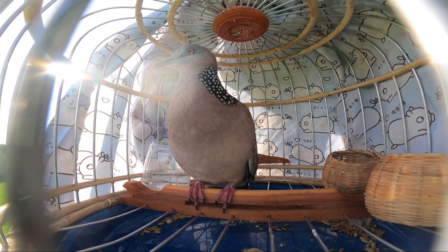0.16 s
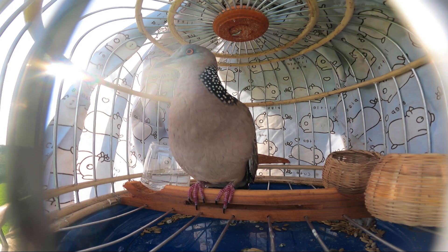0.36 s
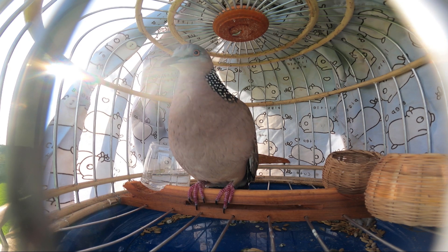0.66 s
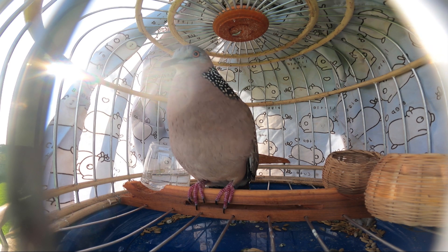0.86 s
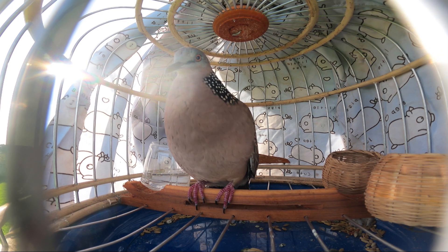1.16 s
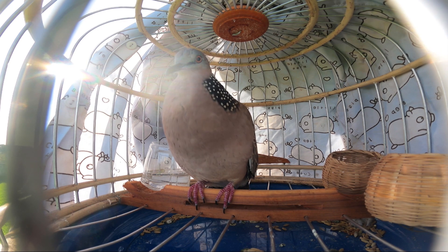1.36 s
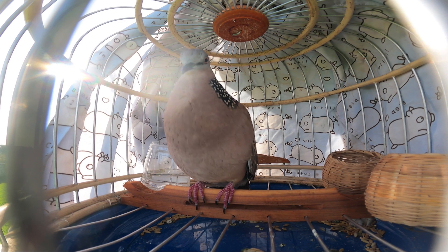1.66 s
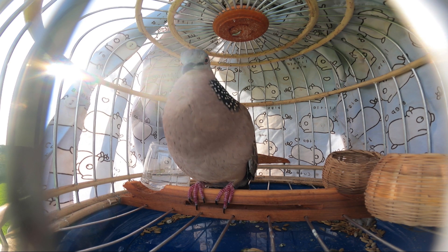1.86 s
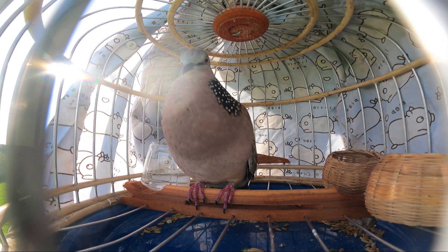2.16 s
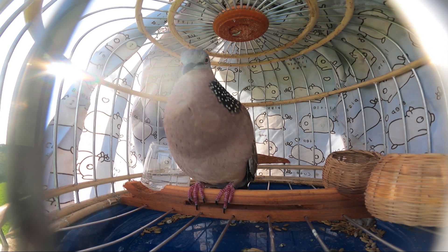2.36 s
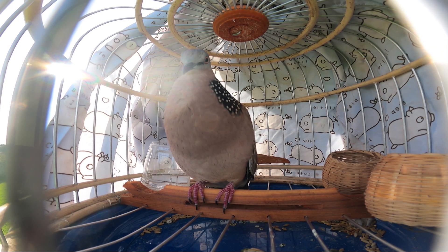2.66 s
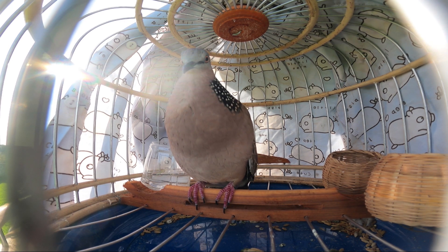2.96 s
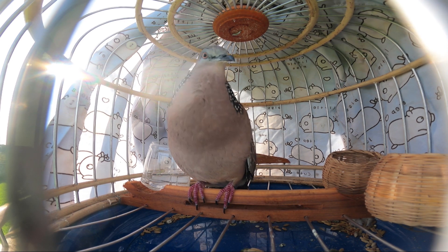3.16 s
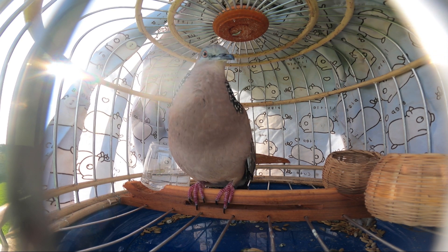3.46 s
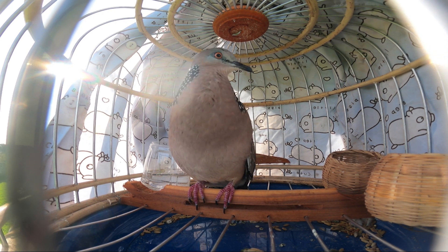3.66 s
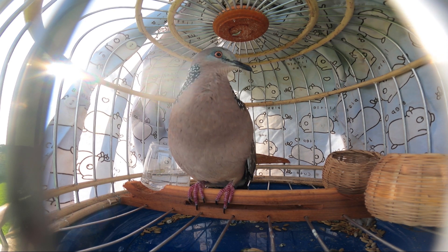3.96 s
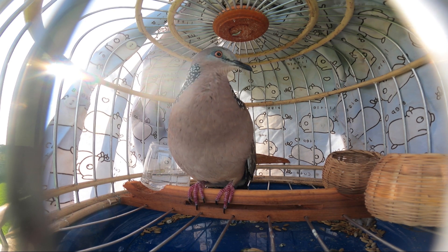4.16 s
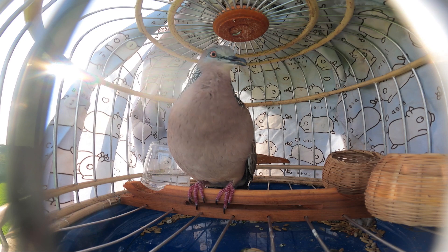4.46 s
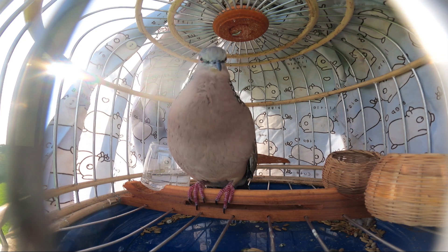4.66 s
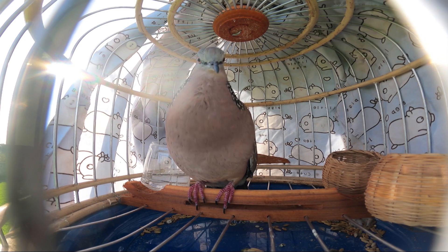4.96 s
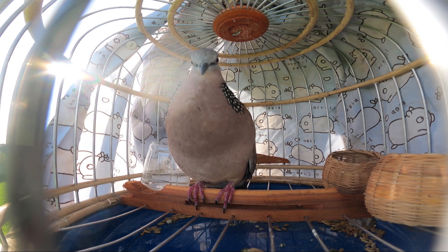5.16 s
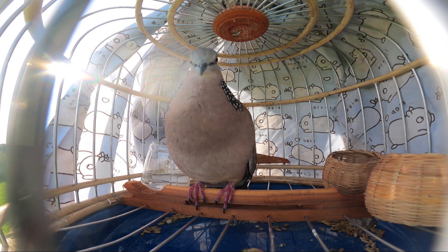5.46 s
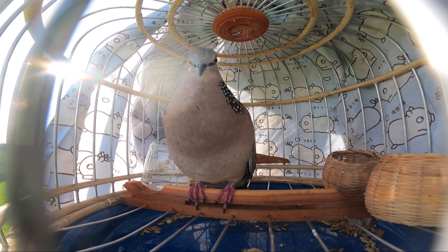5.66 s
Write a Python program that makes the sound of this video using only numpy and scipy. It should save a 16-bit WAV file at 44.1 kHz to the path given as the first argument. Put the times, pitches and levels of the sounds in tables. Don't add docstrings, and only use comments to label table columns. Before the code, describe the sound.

Loud, rounded dove coos with a throbbing roll, slightly overdriven on the left, against low traffic rumble, thin hiss and distant chirps.

```python
import sys
import numpy as np
from scipy import signal
from scipy.fft import rfft, irfft, next_fast_len
from scipy.io import wavfile
from scipy.ndimage import uniform_filter1d

SR = 44100
rng = np.random.default_rng(int(sys.argv[2]) if len(sys.argv) > 2 else 0)


def magnitude_from_level(level_db):
    exponent = np.asarray(level_db, float) / 20
    return 10 ** exponent


def generate_wav(signal):
    frames = np.transpose(np.atleast_2d(signal))
    scaled = np.clip(frames, -1, 1) * 32767
    pcm = np.round(scaled).astype(np.int16)
    wavfile.write(sys.argv[1], SR, pcm)


N = 256662


def rms_one(x):
    return x / np.sqrt(np.mean(x ** 2) + 1e-20)


def at_hz(points, hz, column=1):
    points = np.array(points)
    return np.interp(np.log(hz), np.log(points[:, 0]), points[:, column])


def drift(rate_hz):
    r = np.exp(-2 * np.pi * rate_hz * 20 / SR)
    slow = signal.lfilter([1], [1, -2 * r, r * r], rng.standard_normal(N // 20 + 4002))[4000:]
    return np.interp(np.arange(N) / 20, np.arange(len(slow)), rms_one(slow))


def band(x, low_hz, high_hz):
    sos = signal.butter(2, [low_hz, min(high_hz, .47 * SR)], "band", fs=SR, output="sos")
    return signal.sosfilt(sos, x)


def add(out, s, piece):
    i = round(s * SR)
    out[..., i:i + piece.shape[-1]] += piece[..., :N - i]


def swell(length_ms, peak_at=0.21):
    x = np.linspace(0, 1, round(length_ms * SR / 1000))
    return np.sin(np.pi / 2 * np.interp(x, [0, peak_at, 1], [0, 1, 0])) ** 2


def late(x, samples):
    return np.concatenate([np.zeros(samples), x[:N - samples]])


# f/Hz, likeness [0-1]
LIKENESS = [(60, 1), (200, 0.77), (600, 0.47), (1500, 0.63), (3000, 0.05), (8000, 0.11)]
# f/Hz, level/dB
LEAN = [(60, -1), (110, -1.5), (200, -0.5), (400, -1.5), (1290, -2), (2380, 2), (6000, 1), (15000, -1.5)]
TWITTER_HZ, TWITTER_DB = 5000, .8


def banded_noise(spectrum, gains_db, patchy_db):
    out, together = 0, drift(0.98)
    edges_hz = 22 * 2 ** np.arange(0, 9.7, .4)
    white = rng.standard_normal((2, 2, N))
    for k, (low_hz, high_hz) in enumerate(zip(edges_hz, edges_hz[1:])):
        mid, side = band(white[k % 2], low_hz, high_hz)
        hz = np.sqrt(low_hz * high_hz)
        alike = np.clip(at_hz(LIKENESS, hz), 0, 1)
        lean = magnitude_from_level(at_hz(LEAN, hz) / 2)
        flicker_db = patchy_db + TWITTER_DB * np.exp(-np.log(hz / TWITTER_HZ) ** 2 / .2)
        flicker = flicker_db * (1.4 * together + drift(8.2))
        gain = magnitude_from_level(at_hz(spectrum, hz) + gains_db(hz) + flicker)
        stereo = np.sqrt(1 + alike) * mid + np.sqrt(1 - alike) * side * [[1], [-1]]
        out = out + gain * stereo * [[lean], [1 / lean]]
    return out


# t/s, level/dB
TRAFFIC = [(0.0, -43.5), (0.25, -42.5), (1.2, -37.5), (1.75, -35), (2.0, -38.5), (2.93, -35), (3.92, -37.5),
           (3.94, -46), (4.44, -42.5), (5.1, -40.5), (5.82, -35.5)]
# f/Hz, level/dB per Hz
AIR_SPECTRUM = [(12, -44), (20, -15.5), (74, -0.5), (127, -5.5), (172, -5.5), (277, -13.5), (347, -15.5),
                (422, -16),
                (542, -20.5), (1200, -27.5), (2200, -35), (3300, -41), (6010, -46), (7730, -60.5), (9670, -45),
        (16000, -78)]
HUM_FOLLOWS, HISS_FOLLOWS = .85, 0.8
AIR_LAG_SAMPLES = 22


def background():
    s, db = np.transpose(TRAFFIC)
    swing_db = np.interp(np.arange(N) / SR, s, db + 38.2)

    def blend(hz):
        return swing_db * np.interp(np.log(hz), np.log([200, 1200, 7000]), [1, HUM_FOLLOWS, HISS_FOLLOWS])

    left, right = magnitude_from_level(-12.5) * banded_noise(AIR_SPECTRUM, blend, patchy_db=0.76)
    both = np.array([late(left, AIR_LAG_SAMPLES), right])
    return both - .7 * band(both, 7200, 8200)


# f/Hz, level/dB rms
MACHINE = [
    (1373, -73),
]


def whine():
    (hz, db), = MACHINE
    return magnitude_from_level(db) * rms_one(band(rng.standard_normal(N), hz - 12, hz + 12))


def sweeps(table, peak_at):
    out = np.zeros(N)
    for s, length_ms, start_hz, end_hz, db in table:
        shape = swell(length_ms, peak_at) ** 0.53
        phase = 2 * np.pi * np.cumsum(np.linspace(start_hz, end_hz, len(shape))) / SR
        add(out, s, magnitude_from_level(db) * shape * np.sin(phase))
    return out * magnitude_from_level(2.4 * drift(90))


# t/s, length/ms, start f/Hz, end f/Hz, level/dB
SLIDES = [(.02, 53, 1600, 2036, -46.5), (.07, 25, 1950, 1590, -51), (.435, 95, 2540, 2420, -58),
          (.452, 9, 3150, 2450, -51), (.57, 30, 2500, 2660, -50), (.718, 28, 2990, 2205, -45),
          (.742, 9.9, 3420, 3000, -49), (.745, 68, 2520, 2380, -55.5), (.862, 24, 2450, 2580, -55),
          (1.3, 18, 2820, 2640, -52), (1.54, 27, 1583, 1645, -51), (1.563, 17.5, 1630, 1900, -47),
          (1.578, 18, 1900, 1650, -48), (1.608, 22, 2530, 1990, -47), (1.63, 16, 1970, 1950, -54),
          (1.7, 32, 1643, 1715, -50), (1.727, 14, 1720, 1946, -52.5), (2.04, 57, 1650, 1840, -54),
          (2.048, 30, 3580, 3710, -54), (2.228, 30, 5150, 5550, -50), (2.283, 28, 5330, 5330, -55),
          (2.63, 107, 5450, 5250, -58.5), (2.705, 29, 2626, 2460, -40.5), (2.742, 23, 2806, 2430, -38.5),
          (3.172, 20, 2474, 2400, -43), (3.198, 16, 2450, 2250, -50), (3.41, 250, 2040, 2030, -52.5),
          (3.513, 110, 3430, 3520, -49.5), (3.555, 14, 2870, 2350, -42), (3.568, 20, 2750, 2220, -37.5),
          (3.594, 20, 2930, 2170, -41), (3.678, 32, 3500, 3470, -57), (3.72, 120, 2205, 2230, -55),
          (3.891, 44, 3000, 2950, -49), (4.815, 20, 2510, 2490, -55.5), (4.805, 86, 3520, 3560, -53.5),
          (4.885, 12, 5550, 5850, -50.5), (4.83, 50, 4850, 5050, -62.5), (5.04, 67, 1580, 2050, -46.5)]


def far_slides():
    return sweeps(SLIDES, peak_at=0.66)


def yard(x, t60_s=.5):
    t = np.arange(round(.5 * SR)) / SR
    echo = rng.standard_normal((2, len(t))) * magnitude_from_level(-60 * t / t60_s) * np.clip(t / 0.015, 0, 1)
    return signal.fftconvolve(x[None], echo / np.sqrt(np.sum(echo[0] ** 2)), axes=1)[:, :N]


def bursts(table, width, throb_db, rate_hz):
    out, throb = np.zeros(N), magnitude_from_level(throb_db * drift(rate_hz))
    for s, length_ms, hz, db in table:
        shape = swell(length_ms) ** .6
        low_hz, high_hz = hz / width, hz * width
        noise = band(band(rng.standard_normal(SR // 2), low_hz, high_hz), low_hz, high_hz)
        add(out, s, magnitude_from_level(db) * shape * rms_one(noise[999:999 + len(shape)]))
    return out * throb


# t/s, length/ms, centre f/Hz, level/dB
CHURRS = [(.41, 120, 2600, -60), (4.88, 39, 4600, -57), (.55, 83, 2570, -52.5), (.68, 120, 2600, -56),
          (2.62, 120, 5400, -53), (2.62, 60, 4500, -58), (2.715, 87, 2550, -48), (3.04, 130, 5250, -65),
          (3.175, 77, 2450, -51), (3.55, 120, 2610, -47), (4.878, 55, 4600, -46.5), (1.9, 60, 5850, -55.5),
          (4.84, 60, 5500, -57), (.05, 86, 1900, -58.5), (3.62, 50, 4800, -60), (3.64, 100, 5700, -58),
          (3.81, 67, 5000, -54), (.2, 110, 4400, -57), (4.71, 39, 5200, -56.5), (4.715, 40, 3400, -61),
          (3.93, 57, 2450, -54), (5.2, 170, 4400, -55)]


def churrs():
    return bursts(CHURRS, width=1.11, throb_db=4.0, rate_hz=90)


# t/s, length/ms, level/dB
RUSTLES = [
    (0.17, 100, -52),
    (1.097, 82, -51.5),
    (2.045, 71, -56),
    (4.22, 94, -59.5),
    (4.574, 44, -48.5),
    (4.67, 46, -54.5),
    (4.71, 70, -55),
    (5.196, 110, -49),
]
# f/Hz, level/dB per Hz
RUSTLE = [(1470, -65), (2500, -16), (3350, -22.5), (3780, -21), (6190, -16.5), (7700, -33), (9210, -20.5),
          (15000, -62)]


def rustles():
    gate = np.zeros(N)
    for s, length_ms, db in RUSTLES:
        add(gate, s, magnitude_from_level(db) * swell(length_ms, peak_at=0.18))
    size = next_fast_len(N)
    hz = np.fft.rfftfreq(size, 1 / SR) + 1
    spectrum = rfft(rng.standard_normal((2, size))) * magnitude_from_level(at_hz(RUSTLE, hz))
    return gate * magnitude_from_level(3.5 * drift(200)) * rms_one(irfft(spectrum, size)[:, :N])


# t/s, length/ms, start f/Hz, end f/Hz, level/dB
CHIRPS = [
    (.191, 15, 3250, 3750, -47),
    (.211, 34, 3060, 3460, -39.5),
    (5.213, 14, 3300, 3700, -51),
    (5.233, 34, 3060, 3460, -39),
]


def chirps():
    return sweeps(CHIRPS, peak_at=1.0)


# t/s, peak level/dB
TICKS = [(0.2576, -52), (0.2963, -46.5), (0.36, -44.5), (0.458, -51), (0.4813, -45.5), (0.657, -51),
         (0.743, -60), (0.96, -56), (1.1662, -45.5), (1.315, -33.5), (2.479, -51.5), (2.7055, -52),
         (2.819, -58), (3.9301, -60), (4.0767, -53), (4.156, -52), (4.3644, -49.5), (4.434, -57),
         (4.562, -54), (4.586, -43), (4.66, -54), (4.683, -47), (4.9876, -50), (5.319, -43.5),
         (5.382, -43.5)]
# f/Hz, level/dB, t60/s
WICKER = [(4300, -5, .008), (6700, -1, .008), (8500, 0, .009), (10600, -3, .006), (12100, -3, .006)]
# t/s, level/dB
SNAPS = [
    (.245, -52),
    (.743, -53),
    (4.986, -55),
    (3.929, -43.5),
    (4.212, -55),
    (5.268, -50),
]


def cage():
    out, contact = np.zeros((2, N)), swell(7.0, peak_at=.55)
    strengths_db = rng.normal(0, 2.5, (len(TICKS), len(WICKER)))
    scrapes = rng.standard_normal((len(TICKS), 2, len(contact))) * contact
    for k, (hz, level_db, t60_s) in enumerate(WICKER):
        clicks = np.full((2, N), 1e-18)
        for (s, db), strength_db, (both, own) in zip(TICKS, strengths_db, scrapes):
            stereo = np.array([both + 0.19 * own, both - 2.7 * own])
            add(clicks, s - .002, magnitude_from_level(db + level_db - 25.5 + strength_db[k]) * stereo)
        r, w = magnitude_from_level(-60 / (t60_s * SR)), 2 * np.pi * hz / SR
        out += signal.lfilter([0, np.sin(w)], [1, -2 * r * np.cos(w), r * r], clicks)
    for (s, db), scrape in zip(TICKS, scrapes):
        add(out, s - .002, magnitude_from_level(db - 11) * band(scrape, 4000, 10000))
    for s, db in SNAPS:
        add(out, s, magnitude_from_level(db) * contact * band(rng.standard_normal((2, len(contact))), 1000, 9000))
    return out


# t/s, f/Hz, level/dB rms
HELD_NOTES = [
    [(1.315, 400, -40), (1.321, 420, -32), (1.328, 385, -34), (1.333, 410, -32), (1.342, 490, -17),
     (1.359, 548, -8), (1.368, 556, -8.9)],
    [(1.368, 556, -8.9), (1.374, 562, -8), (1.385, 572, -7.6), (1.433, 616, -7.1), (1.478, 592, -6.9),
     (1.496, 541, -8.9), (1.547, 497, -13.6), (1.568, 405, -33)],
    [(2.056, 520, -24), (2.064, 510, -11.5), (2.09, 499, -12.3), (2.16, 460, -17.4), (2.244, 422, -23.6),
     (2.264, 392, -28.5), (2.286, 295, -43)],
    [(2.534, 330, -40), (2.538, 385, -25), (2.543, 420, -20), (2.551, 480, -21.5), (2.5545, 600, -25),
     (2.557, 470, -22)],
    [(2.557, 470, -22), (2.564, 495, -14.5), (2.5705, 525, -18.5), (2.58, 516, -10.6), (2.665, 500, -11.3),
     (2.711, 458, -16.6), (2.75, 375, -28), (2.77, 280, -44)],
    [(5.071, 450, -36), (5.082, 497, -16), (5.103, 533, -8), (5.126, 550, -6.4), (5.166, 616, -6.2),
     (5.224, 603, -6), (5.242, 562, -6), (5.289, 520, -9.3), (5.304, 430, -31)],
]
# mid t/s, peak level/dB, f/Hz, half length/ms, after-ring level/dB
SHORT_NOTES = [
    (1.0298, -10, 508, 12, -14.5),
    (4.784, -7.5, 505.2, 12.32, -15.5),
]
THROBS = [(1.753, -4, 550, 11.3, -8), (1.7752, -7.5, 555.4, 4.4, -17), (1.800, -3, 567.4, 5.73, -12.5),
          (1.8315, -2.5, 572.9, 5.9, -24), (1.8621, -3, 564.4, 6, -7), (1.894, -3.5, 552.8, 7.5, -11.5),
          (1.9216, -4, 552, 7, -15), (1.9471, -4, 550, 6.8, -9), (1.9701, -5.8, 538, 7.24, -11),
          (1.9951, -5.5, 529.6, 8.3, -13.5), (2.0183, -7, 522.2, 8.7, -13.5), (2.032, -9, 528, 3.5, -12.5),
          (2.046, -6.5, 513.9, 8.1, -17.5), (5.4817, -3.5, 540, 11.85, -8), (5.516, -2.5, 582, 6.3, -11.5),
          (5.5466, -3, 572, 5.78, -24), (5.5721, -3.5, 553.7, 5.6, -7.5), (5.6012, -2.5, 567.6, 6.73, -20),
          (5.6322, -2.5, 566.4, 7.4, -13.5), (5.662, -2.5, 553.4, 6, -11.5), (5.686, -3, 554.5, 5.6, -11),
          (5.7104, -2.5, 548.6, 6.1, -8.5), (5.7343, -3, 541.4, 6.93, -6), (5.759, -3.5, 538.5, 7.7, -13.5),
          (5.7804, -5, 533, 7.7, -13.5), (5.8012, -8, 530, 7.1, -8.5), (5.816, -7.5, 504.2, 9, -9)]
# f/Hz, excess level/dB, phase lead/rad
LEFT_EAR = [(400, 3.8, .3), (450, 3.8, .48), (500, 4.2, .7), (560, 4.9, .82), (615, 5.2, .87)]
# f/Hz, level re first/dB
OCTAVE = [(290, 0), (380, -15), (460, -22.5), (530, -41.5), (620, -66)]
# t/s, leftward level/dB
HEAD_TURN = [(1.0, .4), (1.35, .6), (1.55, .5), (1.75, -.1), (2.0, .1), (2.65, -.4), (4.8, -.6), (5.2, -.3),
             (5.7, .1)]
LEAD_DB, LEAD_MS, LEAD_HALF_MS, LEAD_UP_HZ = -16.5, 4.208, 1.22, 69.88
RING_MS, RING_DOWN_HZ = 8.1, 44.52
THROB_RISE_HZ_PER_MS, THROB_SWELL_DB_PER_MS = 1.8, -0.23
LONG_SWELL_DB = .04
SHUT_SHARPER = 1.3
HELD_WAVER = .3


def dove():
    t, power, catches = np.arange(N) / SR, np.zeros(N), np.zeros(N)
    for note in HELD_NOTES:
        s, hz, db = np.transpose(note)
        power += 2 * magnitude_from_level(np.interp(t, s, db, -120, -120)) ** 2
    held = power > 1e-9

    ms = np.arange(-.04, .04, 1 / SR) * 1000
    for k, (s, db, hz, half_ms, ring_db) in enumerate(SHORT_NOTES + THROBS):
        rolled = k >= len(SHORT_NOTES)
        flatness = (1.8 + half_ms / 5) * np.where(ms > 0, SHUT_SHARPER, 1)
        body = np.exp(-np.abs(ms / half_ms) ** flatness)
        body = body * magnitude_from_level((THROB_SWELL_DB_PER_MS + LONG_SWELL_DB * max(half_ms - 8, 0)) * rolled * ms)
        ring = magnitude_from_level(ring_db) * (ms > 0) * np.exp(-np.maximum(ms - half_ms, 0) / RING_MS)
        lead = rolled * magnitude_from_level(LEAD_DB) * np.exp(-((ms + half_ms + LEAD_MS) / LEAD_HALF_MS) ** 2)
        add(power, s - .04, magnitude_from_level(db) ** 2 * (body ** 2 + ring ** 2))
        add(catches, s - .04, magnitude_from_level(db) * lead)

    marks = [(s, hz) for note in HELD_NOTES for s, hz, db in note]
    for s, db, hz, half_ms, _ in THROBS:
        marks.append((s - (half_ms + LEAD_MS) / 1000, hz + LEAD_UP_HZ))
        marks.append((s + half_ms / 800, hz - RING_DOWN_HZ))
        for side in (-1, 1):
            marks.append((s + side * half_ms / 1500, hz + side * half_ms * THROB_RISE_HZ_PER_MS))
    for s, db, hz, half_ms, _ in SHORT_NOTES:
        marks += [(s + side * half_ms / 1200, hz) for side in (-1, 1)]
    marks = np.array(sorted(marks))

    level = (np.sqrt(uniform_filter1d(power, 40)) - catches) * magnitude_from_level(.25 * drift(61))
    waver_hz = 60 * drift(152.4) / (0.5 + (level / 0.05605) ** 2) * np.where(held, HELD_WAVER, 1)
    pitch = np.clip(np.interp(t, *marks.T) + 3 * drift(60) + waver_hz, 260, 900)
    phase = 2 * np.pi * np.cumsum(pitch) / SR
    phase = phase + np.array([at_hz(LEFT_EAR, pitch, column=2), 0 * t])
    tone = np.sin(phase) + magnitude_from_level(at_hz(OCTAVE, pitch)) * np.sin(2 * phase + 1)
    strain = magnitude_from_level(-52.5) * np.sin(3 * phase) + magnitude_from_level(-47) * np.sin(4 * phase[1])
    strain = strain + magnitude_from_level(-52) * np.sin(5 * phase) + magnitude_from_level(-58) * np.sin(6 * phase)
    tone += magnitude_from_level(6) * np.abs(level) ** 3.6 * strain

    edge = uniform_filter1d(np.abs(np.gradient(level)), 90) * SR / 100
    breath = rms_one(band(band(rng.standard_normal(N), 625, 840), 625, 840))
    left_db = at_hz(LEFT_EAR, pitch) + np.interp(t, *np.transpose(HEAD_TURN))
    return (tone * level + magnitude_from_level(-35.5) * edge * breath) * np.array([magnitude_from_level(left_db), 1 + 0 * t])


# t/s, length/ms, centre f/Hz, level/dB
RASPS = [
    (1.038, 47, 635, -34),
    (1.312, 50, 756, -31.5),
    (1.733, 13, 712, -40.5),
    (2.535, 38, 704, -35),
    (4.796, 45, 633, -31.5),
    (5.066, 36, 673, -31),
    (5.466, 14, 637, -39.5),
]


def rasps():
    return bursts(RASPS, width=1.27, throb_db=1.5, rate_hz=120) * magnitude_from_level(np.array([[3], [-2]]))


# t/s, f/Hz, level/dB
WHISTLES = [
    [(2.071, 2950, -55), (2.079, 3220, -49), (2.103, 3480, -47), (2.115, 3680, -36), (2.155, 3870, -36),
     (2.175, 4050, -41), (2.195, 4250, -45), (2.205, 4450, -46), (2.215, 4600, -54)],
    [(2.186, 4450, -52), (2.197, 4720, -41), (2.208, 5050, -47), (2.217, 5300, -41), (2.23, 5550, -50)],
    [(2.204, 5700, -46), (2.216, 5880, -39), (2.222, 6050, -42), (2.232, 6250, -50)],
    [(4.74, 3168, -55), (4.79, 3597, -45), (4.81, 3993, -38), (4.87, 4296, -39), (4.876, 4400, -45),
     (4.881, 4600, -37), (4.887, 5000, -48), (4.895, 5000, -58)],
]
WET_DB, WET_DB_PER_KHZ = -42.5, -6


def whistles():
    out = np.zeros((2, N))
    for rows in WHISTLES:
        s, hz, db = np.transpose(rows)
        t = np.arange(s[0], s[-1], 1 / SR)
        pitch = np.interp(t, s, hz)
        phase = 2 * np.pi * np.cumsum(pitch) / SR
        fade = np.clip(np.minimum(t - s[0], s[-1] - t) / 0.015, 0, 1)
        wet_db = WET_DB + WET_DB_PER_KHZ * np.abs(pitch / 1000 - 4.7)
        levels = np.sqrt(2) * magnitude_from_level(np.array([np.interp(t, s, db), wet_db]))
        add(out, s[0], levels * fade * (np.sin(phase) + magnitude_from_level(-37.5) * np.sin(3 * phase)))
    return out * magnitude_from_level(np.array([[2.6], [0]]) * drift(130))


# left delay/ms, right delay/ms, level/dB
NEAR_WALLS = [
    (12.1, 24, -15),
    (26.6, 21, -8),
    (62, 74, -17.5),
]


def near_walls(calls):
    out = np.zeros((2, N))
    for left_ms, right_ms, db in NEAR_WALLS:
        out += magnitude_from_level(db) * np.array([late(calls, round(ms * SR / 1000)) for ms in (left_ms, right_ms)])
    return out


FAR_LAG_SAMPLES = 4
LEFT_BIRD_DB = 9.5


def scene():
    distant, churr, chirp = far_slides(), churrs(), chirps()
    calls, spread = whistles()
    far = distant + churr
    send = spread + magnitude_from_level(-19.5) * chirp + magnitude_from_level(-9.0) * distant + magnitude_from_level(-3.0) * churr
    far = np.array([late(far, FAR_LAG_SAMPLES), far]) + yard(send)
    far += (calls + chirp) * magnitude_from_level(np.array([[3.5], [3.5 - LEFT_BIRD_DB]]))
    far += near_walls(calls)
    return background() + whine() + far + rustles() + cage() + dove() + rasps()


def roll_off(x):
    return signal.sosfilt(signal.butter(12, 20000, fs=SR, output="sos"), x)


# t/s, drop level/dB, recovery/s
GAIN_STEPS = [
    (1.4335, -2.6, .12),
    (5.169, -2.6, .12),
]
OVERLOAD = 1.01


def record(dry):
    t, gain_db = np.arange(N) / SR, np.zeros(N)
    for s, drop_db, recovery_s in GAIN_STEPS:
        gain_db += drop_db * np.interp(t, [s, s + .002, s + .16, s + .16 + recovery_s], [0, 1, 1, 0])
    clipped = np.clip(dry * magnitude_from_level(gain_db), -OVERLOAD, OVERLOAD)
    above = signal.sosfilt(signal.butter(8, 15900, "high", fs=SR, output="sos"), clipped)
    dull = signal.sosfiltfilt(signal.butter(10, 15900, fs=SR, output="sos"), clipped)
    return roll_off(dull + magnitude_from_level(-25) * above)


dry = scene()
out = record(dry)
generate_wav(out)
```